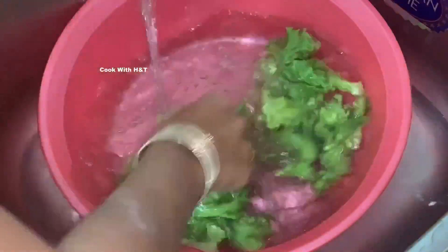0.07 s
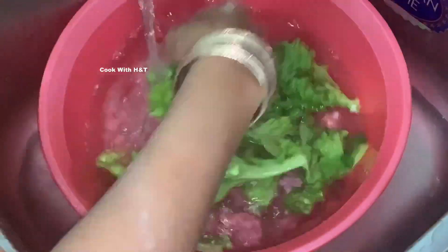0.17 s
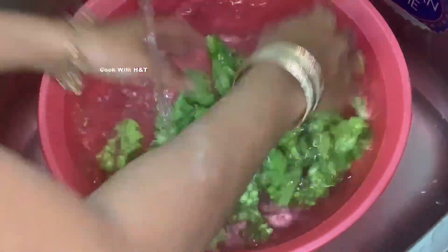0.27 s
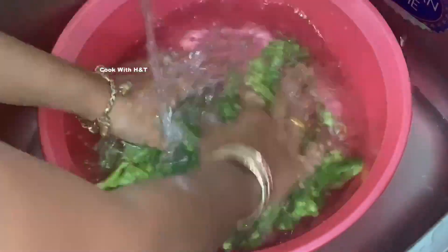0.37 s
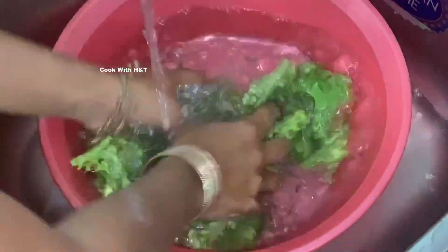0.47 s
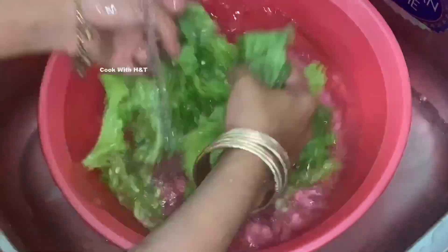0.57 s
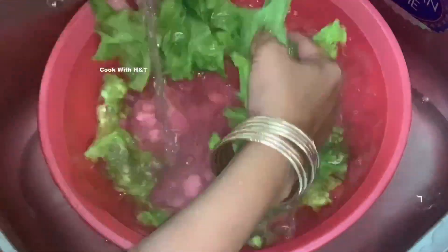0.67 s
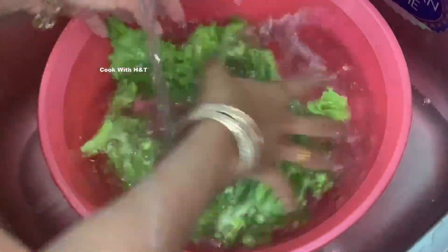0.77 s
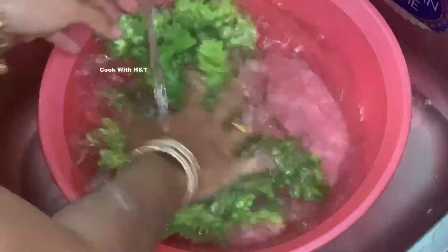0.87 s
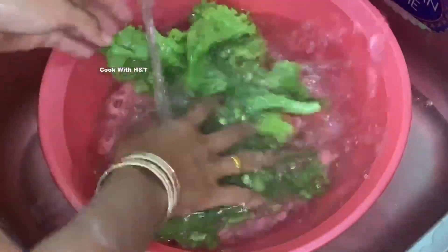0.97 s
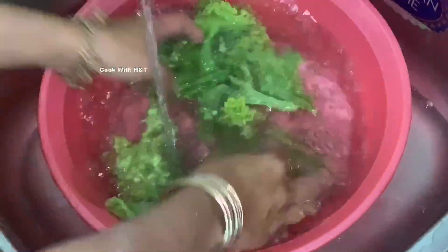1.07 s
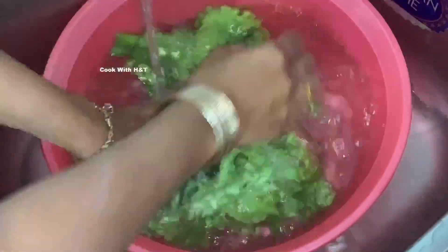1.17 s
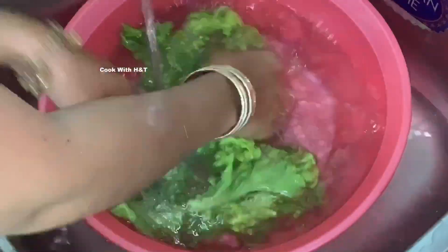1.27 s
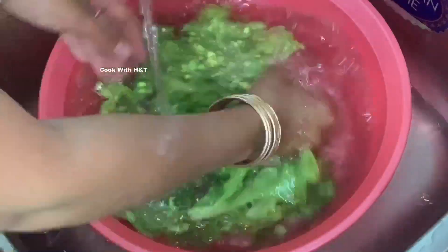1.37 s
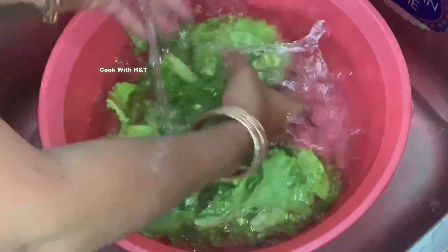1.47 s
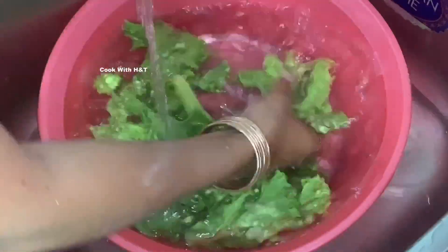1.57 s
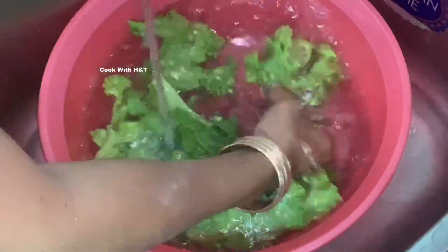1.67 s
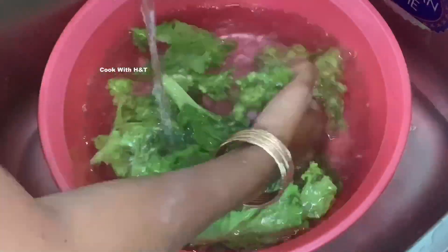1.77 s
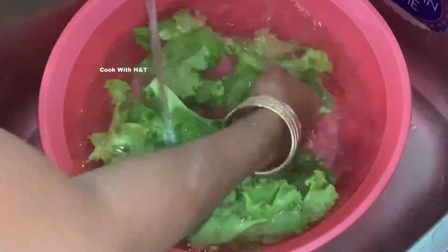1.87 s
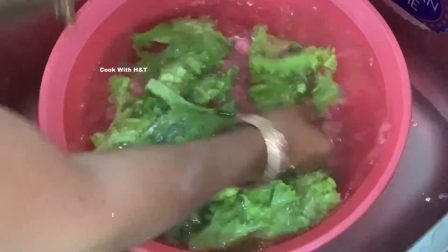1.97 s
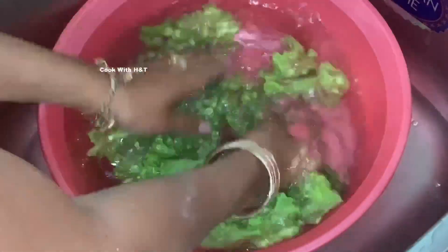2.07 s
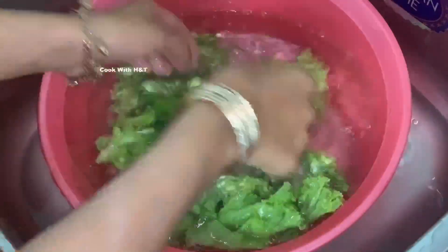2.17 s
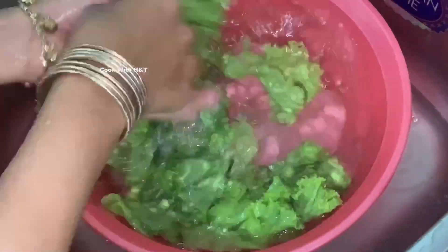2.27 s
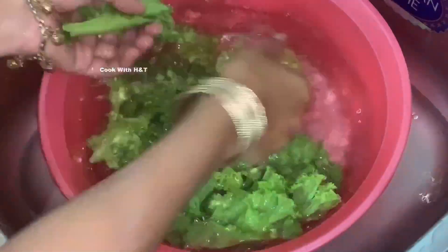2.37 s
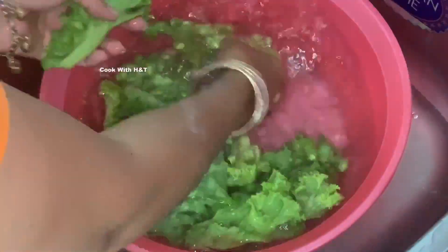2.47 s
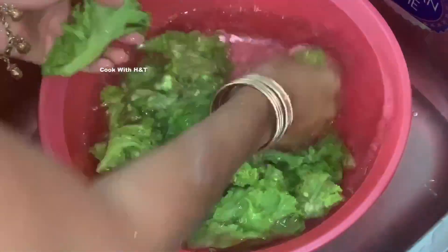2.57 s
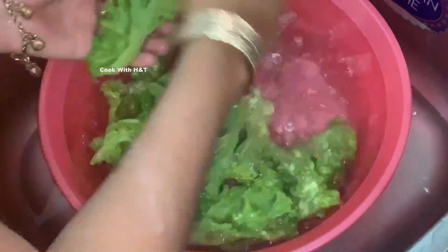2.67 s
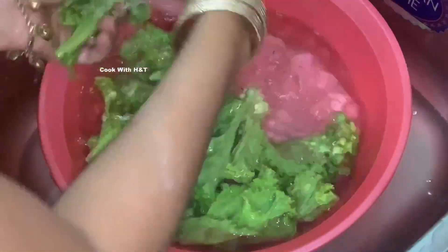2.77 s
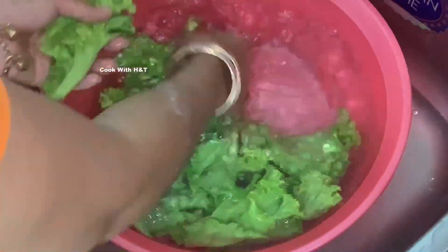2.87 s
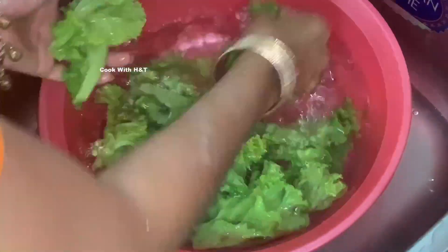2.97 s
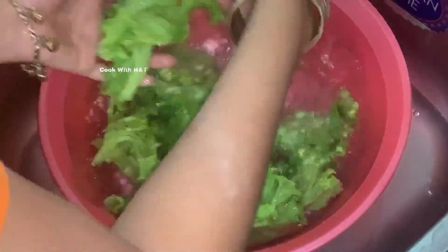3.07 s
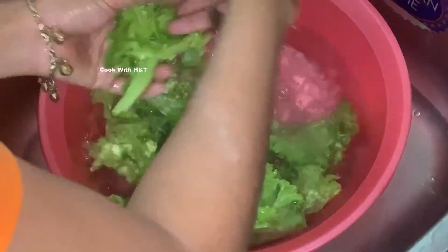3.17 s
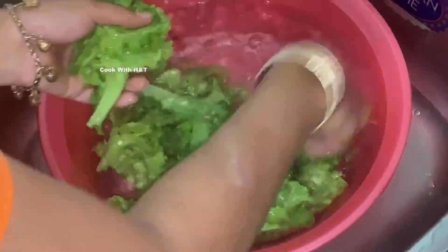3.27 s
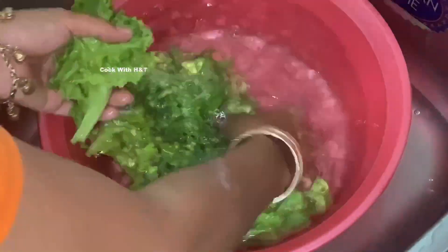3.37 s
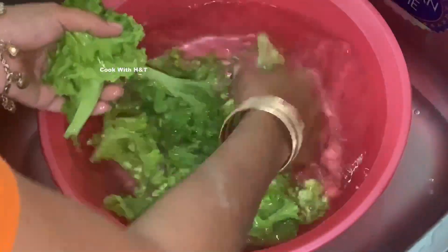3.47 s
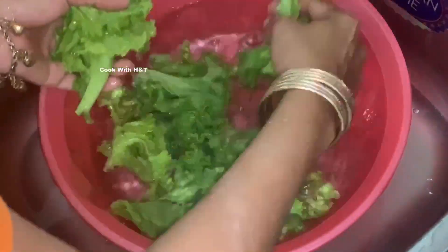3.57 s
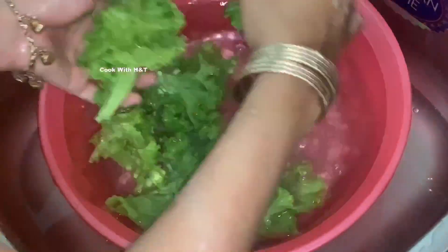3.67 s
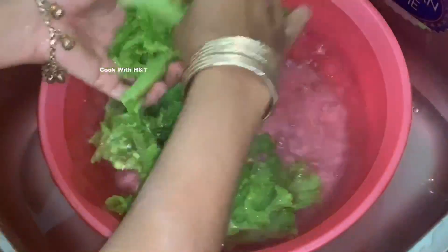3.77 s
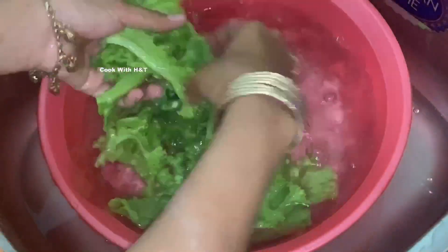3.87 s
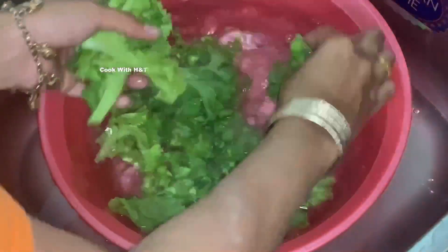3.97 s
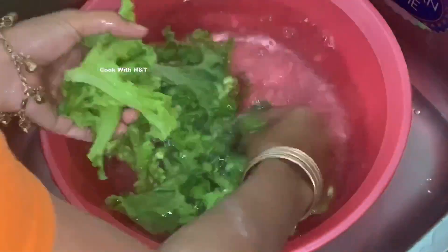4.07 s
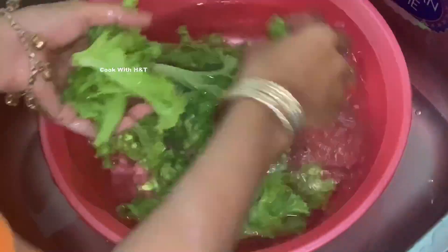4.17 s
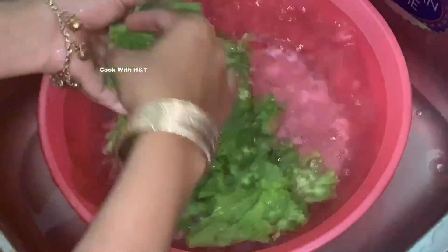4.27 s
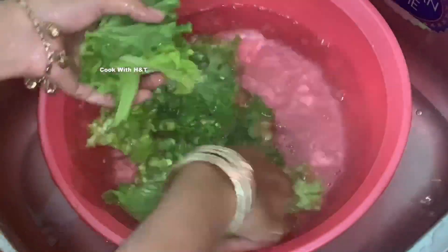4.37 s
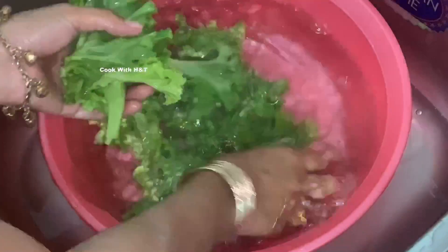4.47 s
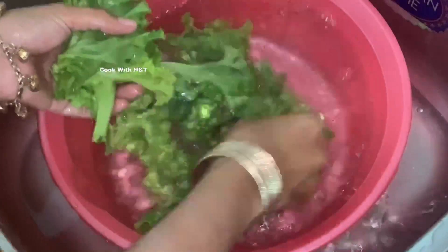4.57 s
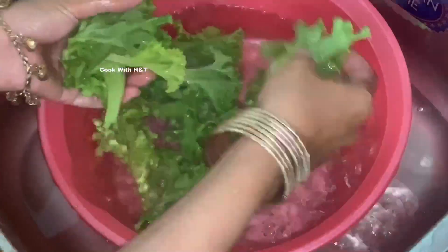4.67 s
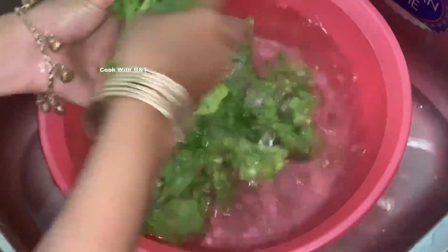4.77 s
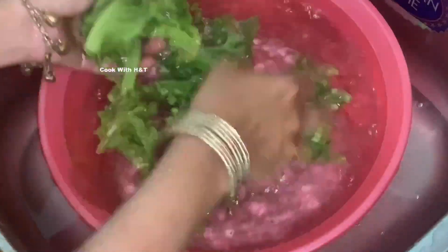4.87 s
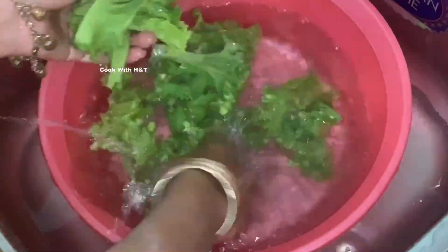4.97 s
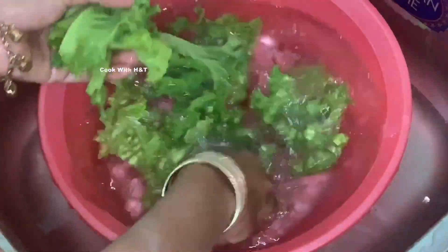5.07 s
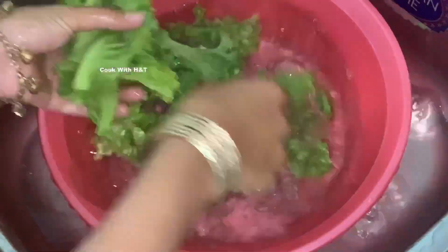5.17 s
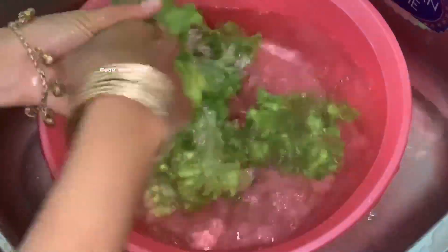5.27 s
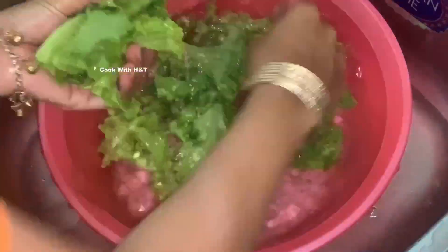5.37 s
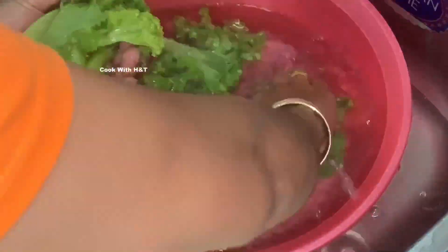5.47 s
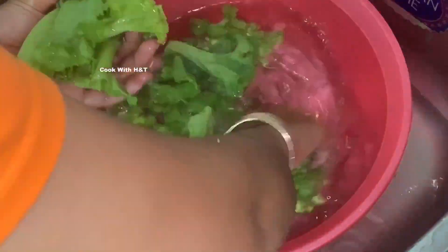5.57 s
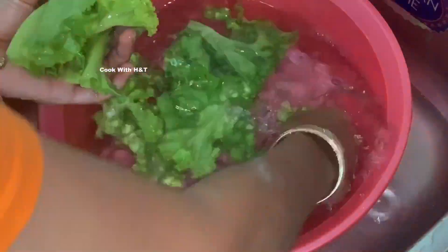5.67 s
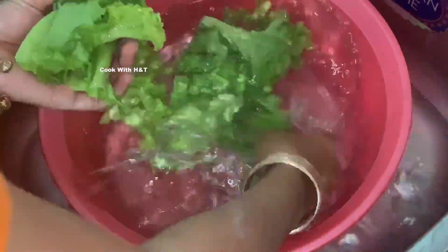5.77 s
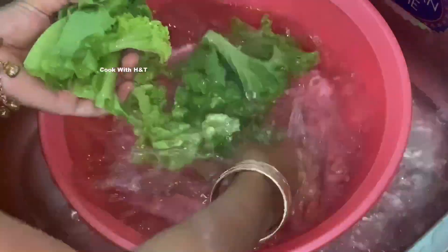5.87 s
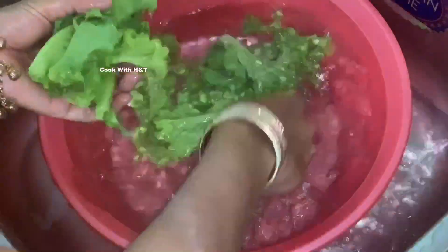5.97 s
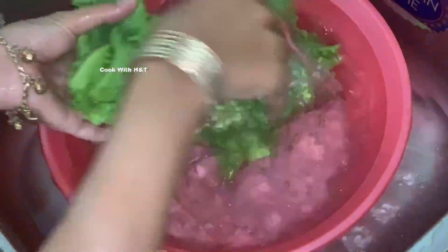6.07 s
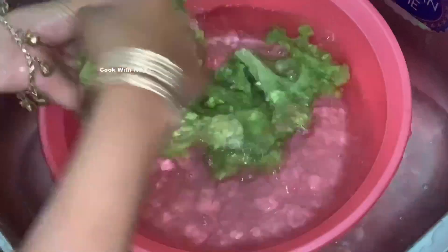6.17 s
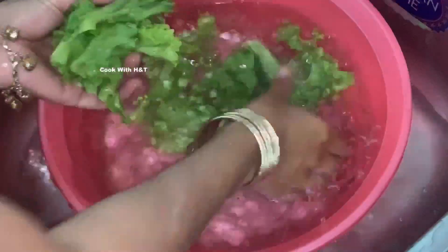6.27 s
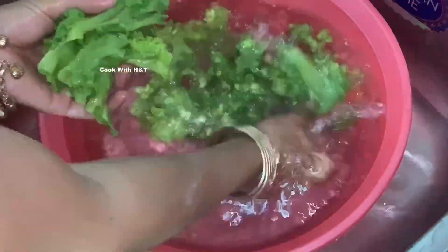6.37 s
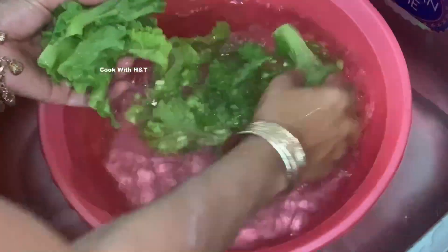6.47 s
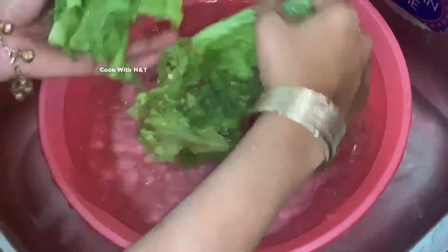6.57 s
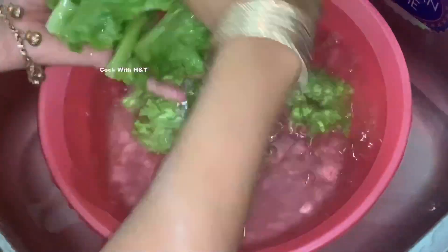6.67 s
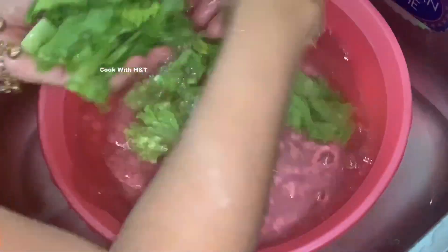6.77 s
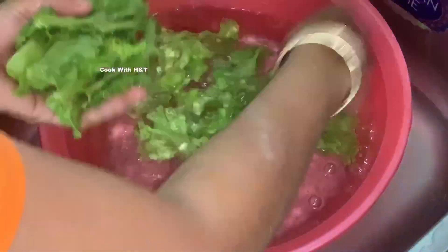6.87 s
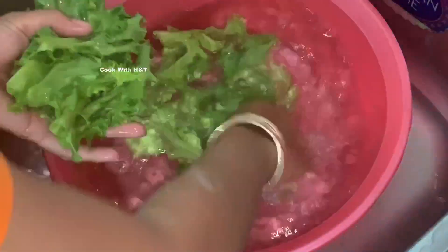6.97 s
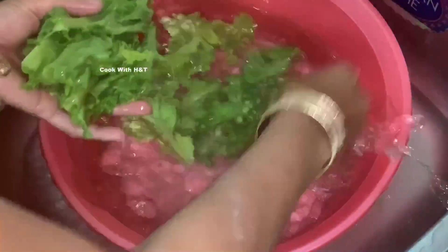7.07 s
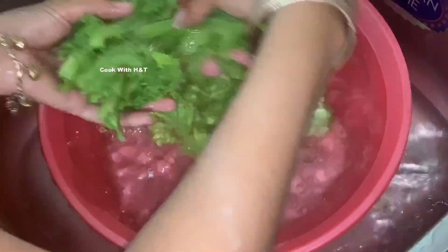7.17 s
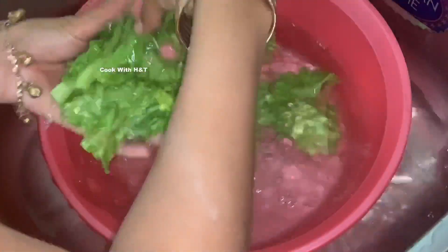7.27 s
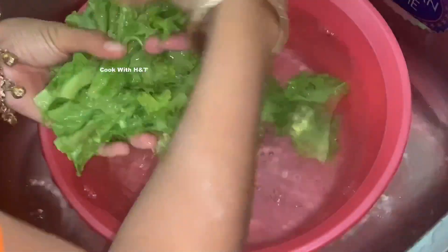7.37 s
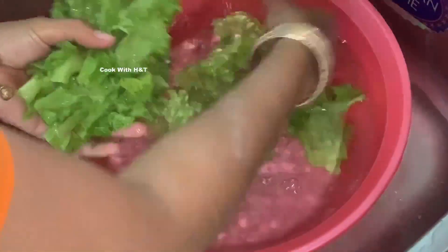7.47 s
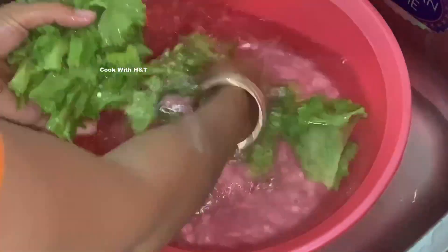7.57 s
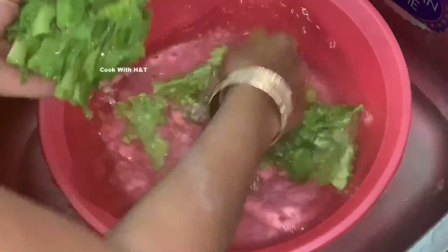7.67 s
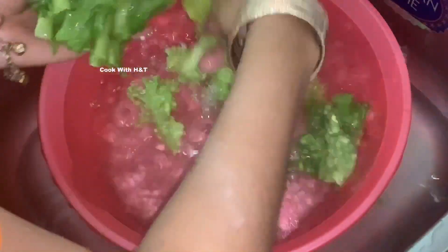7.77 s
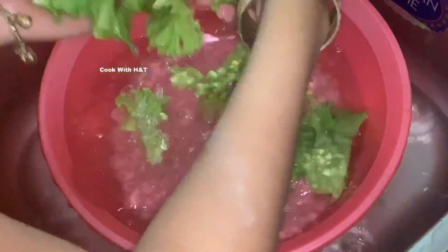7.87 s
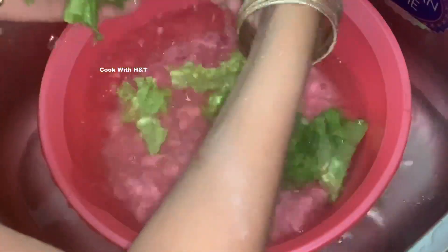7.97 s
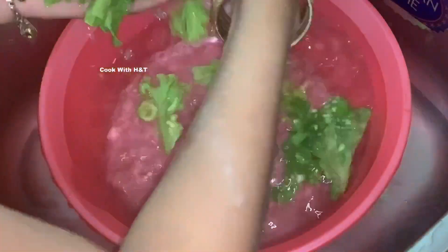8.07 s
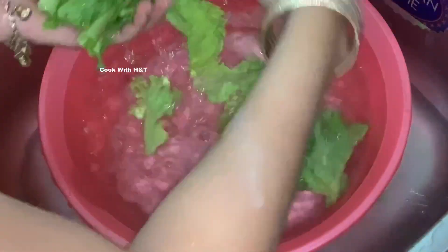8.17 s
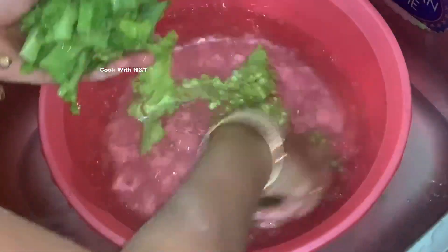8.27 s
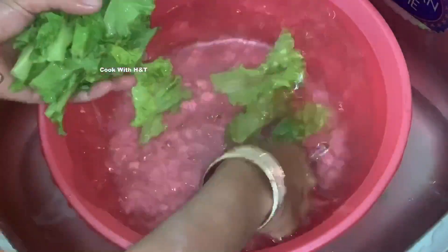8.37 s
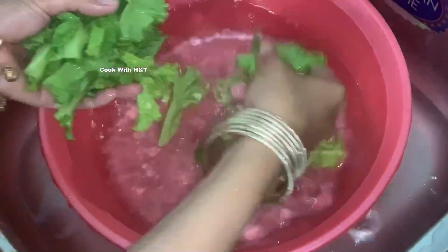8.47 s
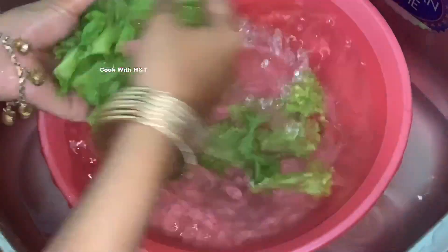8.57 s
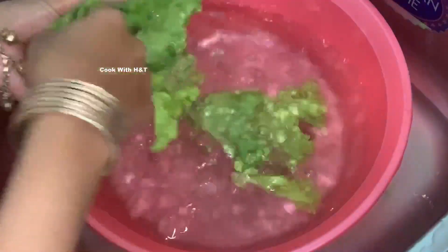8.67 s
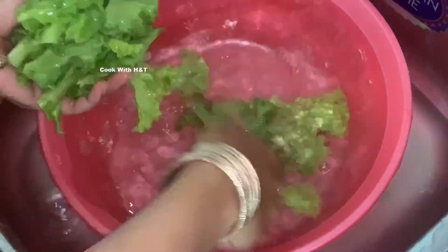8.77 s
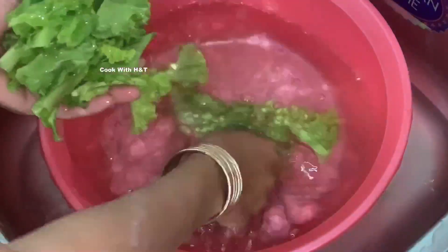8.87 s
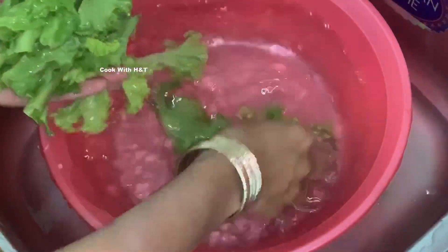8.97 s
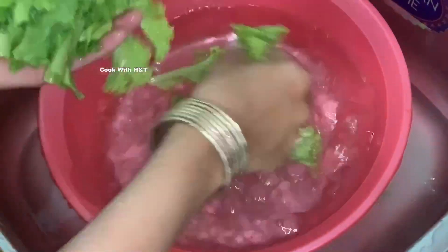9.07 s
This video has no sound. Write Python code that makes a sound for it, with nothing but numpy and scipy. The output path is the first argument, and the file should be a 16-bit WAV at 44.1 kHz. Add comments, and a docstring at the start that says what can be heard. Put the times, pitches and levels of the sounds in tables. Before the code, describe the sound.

Very close to a plastic bowl in a kitchen sink, a tap gurgles while hands churn leafy greens in vigorous bubbly swishes. At about two seconds the water shuts off quickly. Irregular strokes continue, with sharp plinks, spray ticks, small gulps and low bowl thuds, between short gaps of trickling and quiet room air. A close stereo microphone catches a short, small-room reflection.

```python
"""Washing lettuce in a bowl

Leaves are washed by hand in a plastic bowl in a sink, close to a two-port microphone. A tap gurgles
into the bowl for two seconds and is shut; swarms of rising sines and noise carry its jet and the strokes.
Single damped sines plink and gulp, noise bursts tick and splat, and resonant noise booms in the bowl.
A small kitchen answers with a decaying noise tail, over quiet air and a low hum of narrow-band noise."""
import sys
import numpy as np
from scipy import signal
from scipy.fft import rfft, irfft, next_fast_len
from scipy.io import wavfile

SR = 44100
rng = np.random.default_rng(int(sys.argv[2]) if len(sys.argv) > 2 else 0)


def wav_record(signal):
    """Record a signal, one row per channel, as 16-bit PCM in the file named by sys.argv[1]."""
    frames = np.transpose(np.atleast_2d(signal))
    bounded = np.clip(frames, -1, 1)
    # unit amplitude maps onto the largest positive 16-bit level
    quanta = np.round(bounded * 32767).astype(np.int16)
    wavfile.write(sys.argv[1], SR, quanta)


N = 401751  # length in samples

# Event levels are relative; each layer adds its own trim.
# the hand's strokes through the leaves, and the spills that follow:
# start_s, length_s, bubbling_db, spray_db
STROKES = [(0, 0.014, -42, -36), (.17, 0.048, -42.5, -53), (0.32, 0.055, -36.5, -39.5),
           (0.41, 0.061, -42.5, -41), (0.589, 0.19, -41.5, -40.5), (1.055, .13, -40.5, -44.5),
           (1.348, 0.057, -42, -44), (1.397, .13, -42.5, -45), (1.8, 0.04, -48, -65),
           (2.055, 0.055, -42, -46), (2.175, 0.038, -53.5, -46), (2.269, 0.2, -53, -51),
           (2.541, 0.071, -44, -55), (2.634, 0.14, -53, -50.5), (2.816, 0.059, -45.5, -42),
           (2.904, 0.14, -44.5, -50.5), (3.118, 0.018, -46.5, -49), (3.314, 0.022, -45.5, -45),
           (3.5, 0.23, -65.5, -53.5), (3.718, .07, -54, -45.5), (3.852, .012, -61, -52),
           (4.025, 0.014, -55, -41), (4.068, 0.056, -42, -50.5), (4.375, 0.054, -46.5, -46.5),
           (4.425, 0.11, -40.5, -53), (4.688, 0.035, -48, -46), (4.941, 0.024, -41.5, -44),
           (4.999, .07, -38.5, -47), (5.15, 0.042, -53.5, -54), (5.247, .025, -48.5, -50),
           (5.308, 0.094, -69, -59.5), (5.436, 0.017, -50, -43.5), (5.564, 0.085, -46, -57),
           (5.665, 0.076, -49, -53), (5.767, .12, -40.5, -39), (5.95, 0.027, -45.5, -50),
           (6.008, 0.031, -53, -45), (6.195, 0.013, -52.5, -49), (6.281, .045, -36.5, -39.5),
           (6.347, 0.065, -40.5, -47), (6.492, 0.076, -65, -53), (6.726, 0.017, -77, -49),
           (6.929, 0.046, -50, -50), (7.004, 0.045, -40, -46), (7.155, 0.047, -58, -48.5),
           (7.466, 0.036, -52, -49), (7.518, 0.13, -46, -47), (7.739, .1, -50, -47),
           (7.94, 0.11, -62, -53.5), (8.272, 0.036, -48.5, -49.5), (8.339, 0.099, -51, -54),
           (8.555, 0.051, -44, -45.5), (8.773, 0.076, -46.5, -47), (8.934, .07, -48.5, -59),
           (9.057, .07, -49, -57.5)]
# the jet from the tap churning the water: time_s, gurgle_db
TAP_GURGLE = [(0, -54.5), (.35, -64), (.45, -54), (.6, -53.5), (.82, -47.5), (.93, -66.5), (1.12, -51),
              (1.24, -69.5), (1.32, -51), (1.5, -50), (1.66, -50.5), (1.79, -51), (1.855, -45),
              (1.94, -51.5), (2.02, -97), (2.15, -110)]
# heavy surges of water against the bowl: start_s, boom_db
SURGES = [(0, -45), (.42, -43), (.66, -41), (.77, -39), (1.07, -39), (1.38, -39.5), (1.47, -45),
          (2.47, -52), (3.4, -47.5), (4.07, -44.5), (4.38, -42), (5.48, -46), (5.63, -47.5), (5.87, -44.5),
          (6.29, -49), (6.37, -46.5), (6.97, -43.5), (8.58, -50), (8.799, -38), (9.06, -52.5)]
# sharp ticks of spray on leaves and plastic: start_s, level_db
TICKS = [(0.22, -22.5), (.339, -24.5), (0.8597, -29.5), (1.268, -30.5), (1.5616, -27.5), (2.0837, -26),
         (2.2514, -33), (2.732, -25.5), (2.835, -41), (2.9242, -29), (3.0264, -33.5), (3.33, -37),
         (4.0505, -35), (4.946, -34), (4.9784, -33), (5.0693, -29), (5.313, -36.5), (5.46, -29),
         (5.635, -33), (5.8692, -25), (5.932, -22.5), (6.3043, -38), (6.7524, -36), (6.8763, -39),
         (6.9495, -35), (7.0065, -25.5), (7.0692, -35), (7.2694, -45), (7.565, -29.5), (7.666, -35),
         (8.019, -37.5), (8.2417, -41), (8.2812, -38), (8.315, -37)]
# drops and bubbles that stand out: start_s, level_db, starting pitch_hz, t60_s
PLINKS = [(0.3406, -33, 3930, 0.012), (0.3572, -32.5, 2860, .029), (0.3708, -23, 3120, .004),
          (.5125, -26.5, 2880, 0.0062), (0.7337, -21.5, 2020, 0.0045), (0.7436, -27.5, 2660, 0.014),
          (.7612, -30, 3720, 0.016), (.8561, -19.5, 3020, 0.0015), (1.1543, -18, 2780, .0063),
          (1.4682, -27, 3800, 0.0059), (1.559, -25.5, 2950, 0.0086), (2.102, -23, 2900, 0.003),
          (2.1425, -28, 2890, 0.016), (2.384, -36, 4030, 0.027), (2.4349, -27.5, 3760, 0.0018),
          (2.565, -34, 3400, 0.017), (2.6074, -44, 1600, 0.017), (2.6688, -33.5, 1530, 0.0055),
          (2.7982, -36.5, 1330, 0.013), (2.98, -30.5, 4350, 0.018), (3.326, -18.5, 3870, 0.0047),
          (3.4185, -30, 2880, 0.014), (3.518, -39, 2476, 0.041), (3.6603, -32.5, 3900, 0.0051),
          (3.6758, -30.5, 2200, 0.017), (3.727, -42, 1768, .049), (4.331, -29.5, 2010, .0084),
          (4.502, -28, 2740, .016), (4.5333, -28, 3400, 0.021), (4.7203, -33.5, 4060, 0.014),
          (4.8995, -39.5, 2840, 0.023), (4.9662, -28, 2120, 0.0075), (5.0843, -38.5, 1454, .038),
          (5.2708, -30.5, 3940, 0.0095), (5.3017, -36.5, 2720, 0.015), (5.4556, -24, 3970, 0.017),
          (5.5728, -38, 1670, 0.0061), (5.635, -34.5, 2330, .017), (5.6876, -26, 2120, 0.0034),
          (5.8262, -37.5, 1530, 0.026), (5.8407, -23.5, 4300, .0077), (5.8774, -28, 3860, 0.015),
          (6.0497, -33.5, 4000, 0.015), (6.0937, -36, 4240, .02), (6.1998, -33, 2690, 0.024),
          (6.3035, -21, 2620, 0.0035), (6.318, -29, 2165, .023), (6.5165, -39, 2720, .02),
          (6.5964, -40.5, 3180, .02), (6.777, -48.5, 1890, 0.037), (6.8408, -38, 2900, 0.0083),
          (6.949, -27.5, 4230, 0.013), (6.969, -29, 2650, 0.025), (7.004, -25.5, 2800, 0.0067),
          (7.031, -38, 2370, .063), (7.1298, -41.5, 1630, 0.019), (7.3084, -47, 3540, .02),
          (7.542, -33.5, 2420, 0.01), (7.5636, -33, 3270, 0.015), (7.6226, -33.5, 5100, .022),
          (7.6472, -28, 3670, 0.0066), (7.773, -38.5, 2570, 0.032), (7.789, -36, 4130, 0.031),
          (7.8644, -34, 2450, .046), (8.036, -45, 2380, 0.066), (8.3998, -33, 4180, 0.015),
          (8.8598, -31, 2530, 0.011), (8.982, -30.5, 2590, 0.05), (9.006, -28.5, 2295, .037)]
# the hand plunges and closes an air pocket: start_s, level_db, starting pitch_hz
PLUNGES = [(2.107, -41.5, 1070), (2.535, -46.5, 1100), (4.077, -34.5, 860), (4.331, -41, 1190),
           (4.374, -45, 577), (4.968, -40, 1160), (5.061, -42.5, 890), (5.459, -41.5, 576),
           (5.593, -51.5, 580), (6.303, -43, 1000), (6.395, -31.5, 1010), (7.006, -45, 1000),
           (8.24, -41, 1260), (8.585, -48.5, 900), (8.794, -40.5, 1210), (8.812, -49, 534)]

# Noise and swarm colours, relative: frequency_hz, density_db (per Hz)
# churned water under the tap
GURGLE_COLOUR = [(200, -17), (300, -2.5), (480, -8), (620, 0.5), (780, -0.5), (1200, 5), (1700, -2.5),
                 (2300, -7.5), (4000, -46)]
# small bubbles among the leaves
SWISH_COLOUR = [(400, -23), (900, -8), (1350, -6), (1650, -6), (1950, -8.5), (2400, 1), (4200, 3),
                (5100, -5.5), (7200, -9.5), (9000, -12.5), (12000, -38)]
# bright spray
SPRAY_COLOUR = [(3000, -9), (5000, -4.5), (7200, 1), (10200, -2.5), (12700, 5), (15200, 4.5), (16000, -8)]
# quiet air of the kitchen
AIR_COLOUR = [(25, -45), (50, -23), (74, -20), (120, 1), (310, -8), (490, -15.5), (1200, -24), (2200, -26),
              (5000, -32), (10000, -36.5), (15000, -40)]
# water pushing on the bowl, the low hum, and the froth of a plunge
PUSH_COLOUR = [(45, -37), (75, -52), (100, 2), (350, -4), (1000, -11.5)]
HUM_COLOUR = [(60, -47), (76, -8.5), (83, -4.0), (90, -10.5), (110, -65)]
FROTH_COLOUR = [(250, 12.5), (550, -5), (1500, 3), (2600, -10)]

# Filter gains: frequency_hz, gain_db
APART_EQ = [(100, -11), (230, 1), (500, -1.5), (3000, 9.5)]
TICK_EQ = [(1000, -4.5), (4000, -1), (7000, 9.5), (10000, 3), (13500, 12.0)]
SPLAT_EQ = [(500, -8.5), (1500, -9), (3500, 14), (6000, 5), (14000, -1)]
KITCHEN_EQ = [(200, -1.5), (600, 6.5), (1200, -2.5), (1900, 5.5),
              (3200, -2.0), (6000, 0.5), (10000, 3), (14000, -11.0)]

# low modes of the filled bowl: frequency_hz, width_hz, relative gain_db
BOWL_MODES = [(106.8, 9.1, -14.5), (120.7, 22, 3), (150.4, 12, -4.5), (196, 40, -29.5), (273, 210, -17)]
# the hollow of bowl and sink: frequency_hz, width_hz, gain_db (relative to the direct water)
HOLLOW_MODES = [(596, 13, 4), (1150, 13, -3.5), (1536, 22, -7), (1697, 140, -6.5), (2750, 9, -8)]
# the kitchen's slow decay: frequency_hz, t60_s
KITCHEN_DECAY = [(200, 0.3), (2000, 0.2), (6000, 0.13), (15000, 0.13)]
# the microphone ports: frequency_hz, left_lead_rad, left_minus_right_db, gain_db
PORTS = [(60, -.45, -3.5, 0), (130, -.5, -5.5, 0), (300, -2.6, -6, 5), (600, -3.95, -2, 5.5),
         (1450, -4.25, 1.3, 5), (2200, -6.4, 0, 1), (4400, -5.6, -3, 0), (7500, -5, -2.7, 2),
         (10000, -3.3, -2, 3), (11300, -1.6, -.5, 1), (13000, -.15, .5, 0)]
PORT_SIGNS = np.array([[.5], [-.5]])  # half of each difference to the left, half to the right

SWELL_SHARE = 0.49  # part of a push's length over which it builds
RELEASE_DB_PER_S = 213.5  # how fast a stroke dies away
TRICKLE_DB, TRICKLE_DB_PER_S = -11.5, 51.5  # water running off the leaves: level against the stroke, fall
JET_BUBBLING_DB, JET_SPRAY_DB = -45.5, -44.5  # steady jet on the leaves, before layer trims
TAP_SHUT_S, SHUT_DB_PER_S = 1.925, 115  # when the tap is shut, and how fast the jet on the leaves dies
SURGE_S, SURGE_DB_PER_S = 0.02, 113  # length of a surge's push, and how fast the rocking settles
RIPPLE_DB, JET_BOOM_DB = -55, 3.5  # restless water between surges; boom against the tap's gurgle table
TOP_HZ = 16000  # upper band limit


def amp(db):
    """Decibels to gain."""
    return 10 ** (np.asarray(db) / 20)


def unit(x):
    """Scale to rms 1."""
    return x / np.sqrt(np.mean(x ** 2) + 1e-20)


def along(points, hz, axis=1):
    """A column of a table, read on a log-frequency axis."""
    table = np.transpose(points)
    return np.interp(np.log(hz + 1), np.log(table[0] + 1), table[axis])


def curves(rows):
    """One value per sample for each column after the time."""
    s, *columns = np.transpose(rows)
    return [np.interp(np.arange(N) / SR, s, column) for column in columns]


def filtered(x, response):
    """x passed through a complex response of frequency."""
    m = next_fast_len(N + SR // 2)
    return irfft(rfft(x, m) * response(np.fft.rfftfreq(m, 1 / SR)), m)[..., :N]


def coloured(x, spectrum):
    """x shaped by a colour table, at rms 1."""
    return unit(filtered(x, lambda hz: amp(along(spectrum, hz))))


def resonances(modes, f):
    """Complex response of damped modes, each peaking at its table gain."""
    return sum(amp(db) * 1j * f * w / (c * c - f * f + 1j * f * w) for c, w, db in modes)


def add(track, starts, waves):
    """Lay rows of sound into a track at their times."""
    index = (starts[:, None] * SR).astype(int) + np.arange(waves.shape[1])
    track += np.bincount(index.ravel(), waves.ravel(), N)[:N]


def bubble(hz, t60, rise, onset, size):
    """Rows of damped sines whose pitch climbs as each bubble nears the surface; onset in cycles."""
    t = np.arange(size) / SR
    age = t / t60[:, None]
    cycles = hz[:, None] * t * (1 + rise * np.minimum(age, 2) / 2)
    decay = np.exp(-np.log(1000) * age)
    wave = np.sin(2 * np.pi * cycles) * decay * (1 - np.exp(-cycles / onset))
    return wave / (np.abs(wave).max(axis=1, keepdims=True) + 1e-9)


def cloud(rate, low_hz, high_hz, life, spread_db, rise, onset, size, busy=0.95):
    """Random bubbles at rms 1; rate per second, t60 about life cycles, busy the share that is born."""
    when, pitch, span, strength, luck = rng.random((int(rate * N / SR), 5)).T
    hz = low_hz * (high_hz / low_hz) ** pitch
    t60 = life * (.5 + span) / hz
    share = (busy * np.ones(N))[(when * N).astype(int)]
    born = luck < share
    loudness = amp(spread_db * np.minimum(-np.log(1 - strength), 4))
    gain = loudness * hz / low_hz / np.sqrt(share)  # fewer bubbles are each made louder
    waves = bubble(hz[born], t60[born], rise, onset, size)
    track = np.zeros(N)
    add(track, when[born] * N / SR, gain[born, None] * waves)
    return unit(track)


def pushes(starts, lengths, levels_db, fall_db_per_s):
    """Power of a series of pushes on the water: each swells, holds and falls away."""
    t, power = np.arange(SR) / SR, np.zeros(N)
    lengths = lengths[:, None] + 1e-4
    swell = np.minimum(t / (SWELL_SHARE * lengths), 1)
    fall_db = fall_db_per_s * np.maximum(t - lengths, 0)
    add(power, starts, (swell * amp(levels_db[:, None] - fall_db)) ** 2)
    return power


def stirring(levels_db, jet_db):
    """Level in dB of the strokes, the trickle after them and the jet on the leaves."""
    s, length = np.transpose(STROKES)[:2]
    hand = pushes(s, length, levels_db, RELEASE_DB_PER_S)
    trickle = pushes(s, length, levels_db + TRICKLE_DB, TRICKLE_DB_PER_S)
    since_shut = np.maximum(np.arange(N) / SR - TAP_SHUT_S, 0)
    jet = amp(jet_db - SHUT_DB_PER_S * since_shut)
    return 10 * np.log10(hand + trickle + jet ** 2 + 1e-12)


def tap():
    """The jet drags air under: a dense swarm of big bubbles gurgles until the tap is shut."""
    gurgle_db, = curves(TAP_GURGLE)
    bubbles = cloud(rate=1500, low_hz=299, high_hz=2800, life=19.4, spread_db=5.0,
                    rise=0.055, onset=1.0, size=1400)
    churn = bubbles + 0.075 * rng.standard_normal(N)
    return amp(gurgle_db + 1.0) * coloured(churn, GURGLE_COLOUR)


def swishing():
    """Leaves dragged through water shed bubbles and a fizz of spray; harder strokes shed more of them."""
    stroke_bubbling_db, stroke_spray_db = np.transpose(STROKES)[2:]
    bubbling_db = stirring(stroke_bubbling_db, JET_BUBBLING_DB)
    spray_db = stirring(stroke_spray_db, JET_SPRAY_DB)
    busy = np.clip(amp(bubbling_db + 42.5), .22, 1)
    climb = .08  # pitch rise over one t60, as a share of the starting pitch
    bubbles = cloud(rate=2400, low_hz=956, high_hz=8606, life=44, spread_db=6.0,
                    rise=climb, onset=0.41, size=1000, busy=busy)
    fizz = cloud(rate=3200, low_hz=4350, high_hz=15700, life=23, spread_db=5.0,
                 rise=climb, onset=0.11, size=240, busy=busy)
    # the jet shatters on the leaves into a finer, fused patter; a small share stays in the later strokes
    patter = cloud(rate=2600, low_hz=1000, high_hz=8650, life=16.3, spread_db=5.0,
                   rise=climb, onset=0.13, size=400)
    patter_share = np.interp(np.arange(N) / SR, [1.94, 2.02], [.45, .12])
    grain = np.sqrt(1 - patter_share) * bubbles + np.sqrt(patter_share) * patter
    swish = coloured(grain + 0.033 * rng.standard_normal(N), SWISH_COLOUR)
    spray = coloured(fizz + 0.39 * rng.standard_normal(N), SPRAY_COLOUR)
    return amp(bubbling_db - 3) * swish + amp(spray_db - 4.0) * spray


def bowl():
    """The jet, the surges and the ripples between them shake the low modes of the bowl."""
    s, db = np.transpose(SURGES)
    gurgle_db, = curves(TAP_GURGLE)
    surge_power = pushes(s, np.full(len(s), SURGE_S), db, SURGE_DB_PER_S)
    power = surge_power + amp(gurgle_db + JET_BOOM_DB) ** 2 + amp(RIPPLE_DB) ** 2
    push = coloured(rng.standard_normal(N), PUSH_COLOUR)
    boom = unit(filtered(push, lambda f: resonances(BOWL_MODES, f)))
    return np.sqrt(power) * boom


def background():
    """A wavering low hum of narrow-band noise over the quiet air of the kitchen."""
    hum = coloured(rng.standard_normal(N), HUM_COLOUR)
    air = coloured(rng.standard_normal((3, N)), AIR_COLOUR)
    apart = filtered(air[:2], lambda f: amp(along(APART_EQ, f)))  # independent at each port
    shared = amp(-61) * hum + amp(-59.5) * air[2]
    return ports(shared) + amp(-59.0) * apart


def drips():
    """Stray drops from the hands and lifted leaves: sparse ringing bubbles at random times."""
    drops = cloud(rate=34, low_hz=1708, high_hz=4990, life=48, spread_db=3,
                  rise=0.13, onset=0.23, size=1800)
    return amp(-65.5) * drops


def kitchen(x):
    """A diffuse noise tail, different at each port; four tails take turns as the splashes move."""
    out = np.zeros((2, N))
    turn = (np.arange(N) / SR / .13).astype(int) % 4  # the next tail every 0.13 s
    for k in range(4):
        hz, t, z = signal.stft(rng.standard_normal((2, SR // 2)), SR, nperseg=256)
        # bowl and sink walls return a quick flutter before the room's slow decay
        room = amp(-60 * t / along(KITCHEN_DECAY, hz)[:, None])
        flutter = amp(10) * amp(-60 * t / 0.014)
        tail = signal.istft(z * (room + flutter), SR, nperseg=256)[1]
        part = np.pad(x * (turn == k), (80, 0))  # pre-delay in samples
        out += signal.fftconvolve(part[None], tail / np.linalg.norm(tail[0]), axes=1)[:, :N]
    return filtered(out, lambda f: amp(along(KITCHEN_EQ, f) + PORT_SIGNS * along(PORTS, f, axis=2)))


def ports(x):
    """Sound from one place reaches the two ports with different phase and level."""
    def response(f):
        """Phase and level differences split between the ports, under a common gain."""
        phase = PORT_SIGNS * along(PORTS, f)
        level_db = PORT_SIGNS * along(PORTS, f, axis=2) + along(PORTS, f, axis=3)
        return np.exp(1j * phase) * amp(level_db)
    return filtered(x, response)


def ticks():
    """Flung droplets land as very short, bright bursts of noise."""
    s, db = np.transpose(TICKS)
    track, t = np.zeros(N), np.arange(700) / SR
    shape = amp(-60 * t / 0.01) * (1 - np.exp(-t / 0.00015))
    add(track, s, amp(db - 4.5)[:, None] * shape * rng.standard_normal((len(s), len(t))))
    return filtered(track, lambda f: amp(along(TICK_EQ, f)))


def plinks():
    """A drop strikes with a brief noise splat, and the bubble that it traps rings."""
    s, db, hz, t60 = np.transpose(PLINKS)
    rings, splats = np.zeros(N), np.zeros(N)
    add(rings, s, amp(db + 0.5)[:, None] * bubble(hz, t60, rise=0.19, onset=0.47, size=2400))
    t = np.arange(600) / SR
    decay = amp(-60 * t / 0.01)
    add(splats, s, amp(db - 10.5)[:, None] * decay * rng.standard_normal((len(s), len(t))))
    return rings + filtered(splats, lambda f: amp(along(SPLAT_EQ, f)))


def plunges():
    """Each air pocket gulps once as a damped sine and breaks into a short low splash of froth."""
    s, db, hz = np.transpose(PLUNGES)
    gulps, burst = np.zeros(N), np.zeros(N)
    gulp = bubble(hz, 14 / hz, rise=0.092, onset=1.0, size=3000)
    add(gulps, s, amp(db - 1.0)[:, None] * gulp)
    t = np.arange(8000) / SR
    shape = amp(-60 * t / 0.12) * (1 - np.exp(-t / 0.00039))
    add(burst, s, amp(db - 9)[:, None] * shape)
    froth = cloud(rate=870, low_hz=356, high_hz=2300, life=14, spread_db=-2.0,
                  rise=0.052, onset=0.57, size=1500)
    return gulps + burst * coloured(froth, FROTH_COLOUR)


def scene():
    """Water, coloured by the hollow it sits in, with bowl, room and background."""
    water = tap() + swishing() + drips() + ticks() + plinks() + plunges()
    water = filtered(water, lambda f: 1 + resonances(HOLLOW_MODES, f))
    direct = ports(amp(0.5) * water + bowl())
    return direct + amp(-0.5) * kitchen(water) + background()


def record(dry):
    """A very steep low-pass closes the band at its upper limit."""
    return filtered(dry, lambda hz: 1 / (1 + (hz / TOP_HZ) ** 200))


dry = scene()
out = record(dry)
wav_record(out)
```